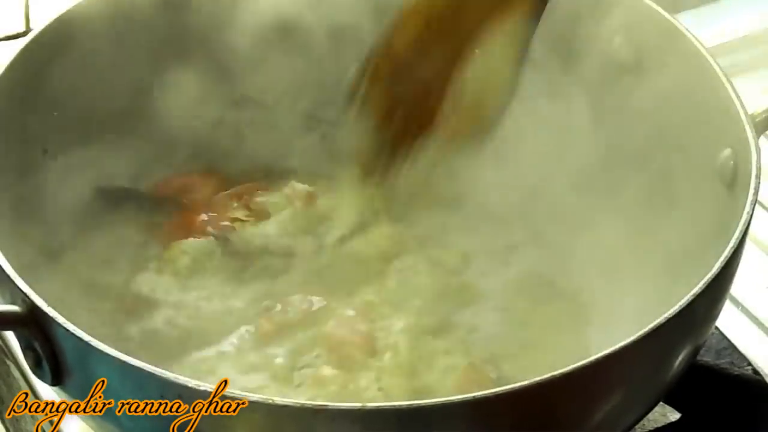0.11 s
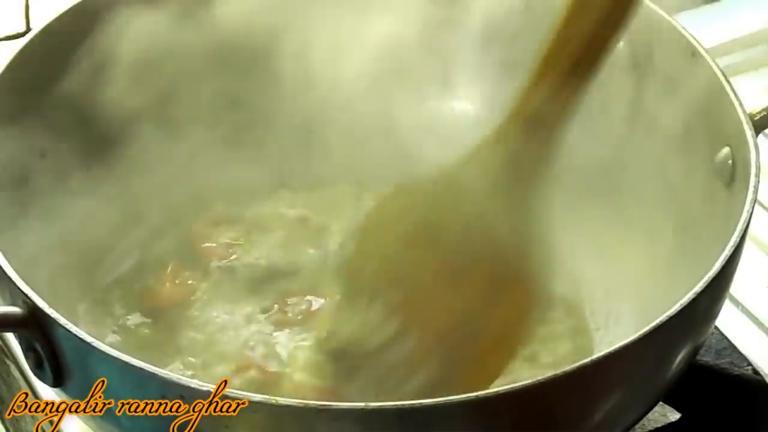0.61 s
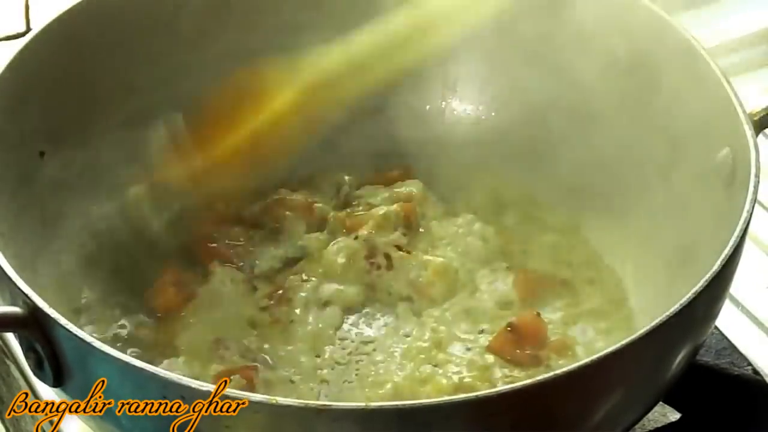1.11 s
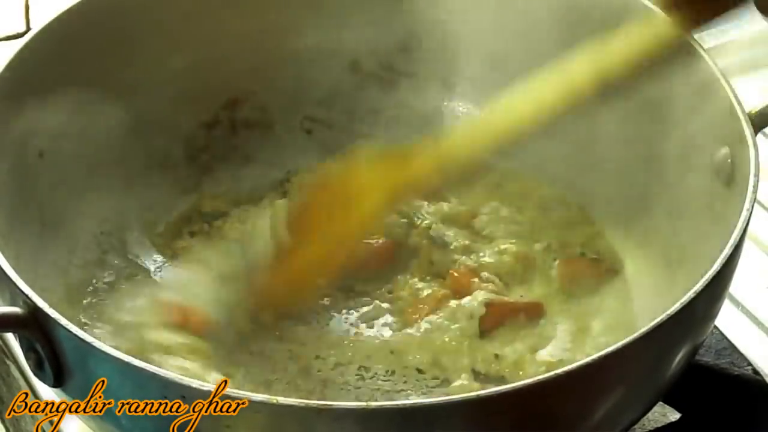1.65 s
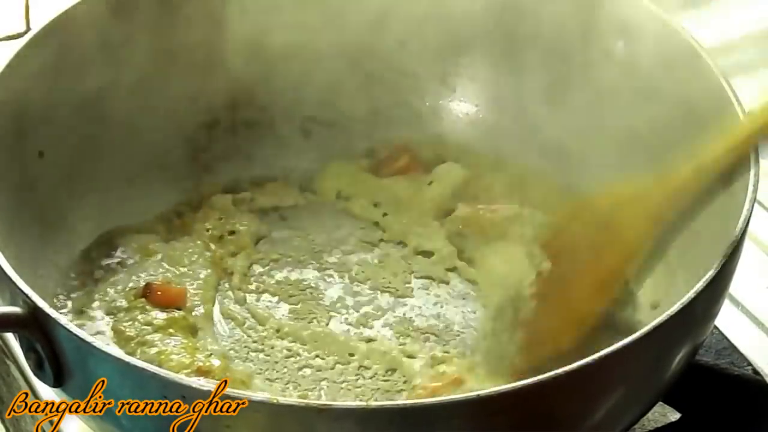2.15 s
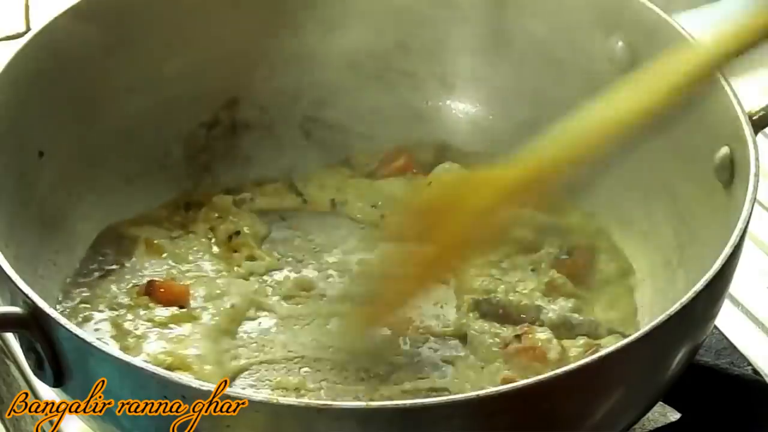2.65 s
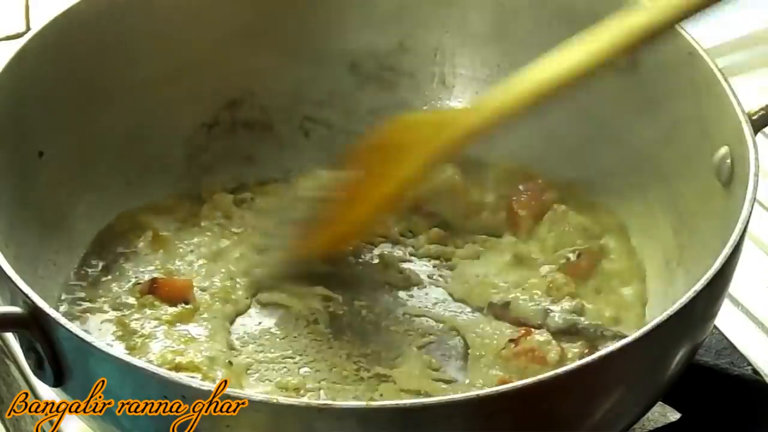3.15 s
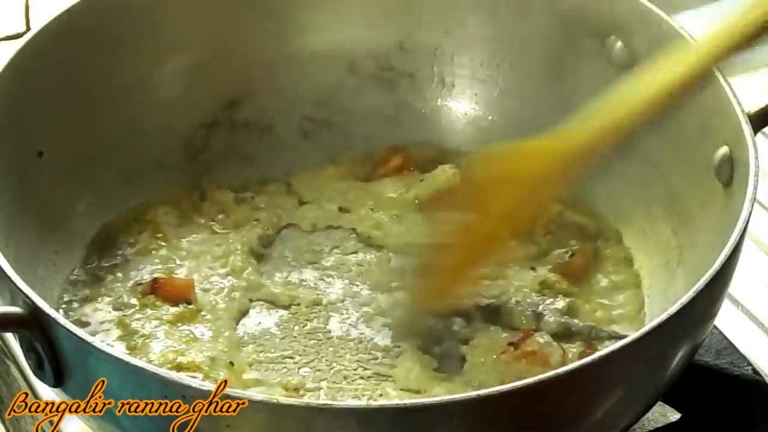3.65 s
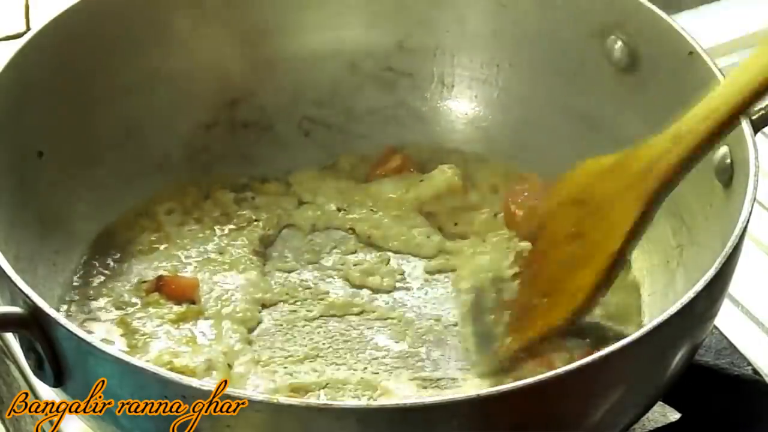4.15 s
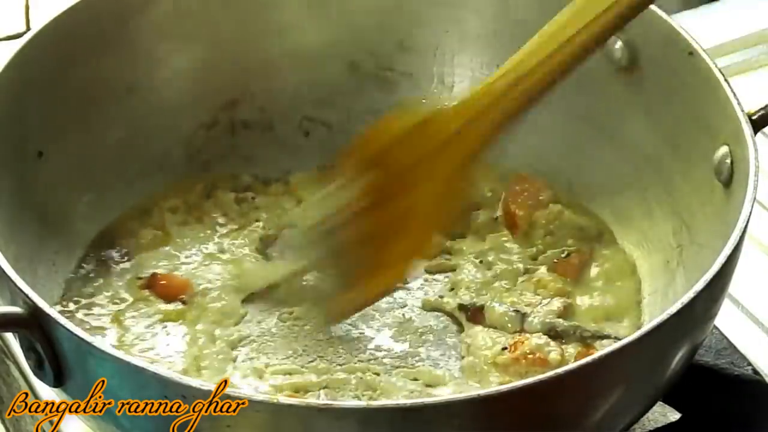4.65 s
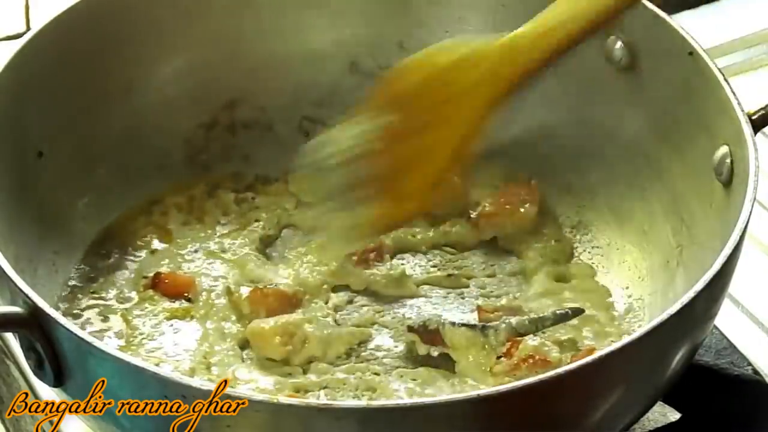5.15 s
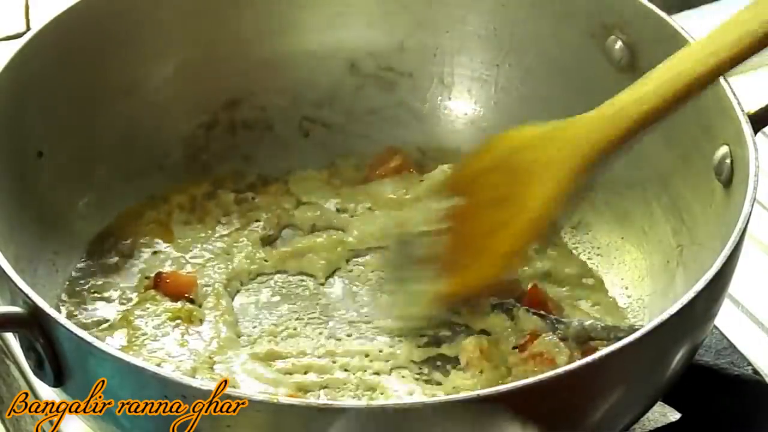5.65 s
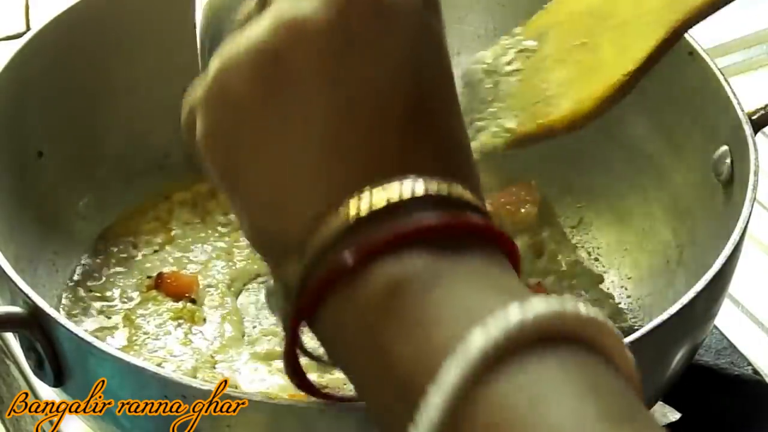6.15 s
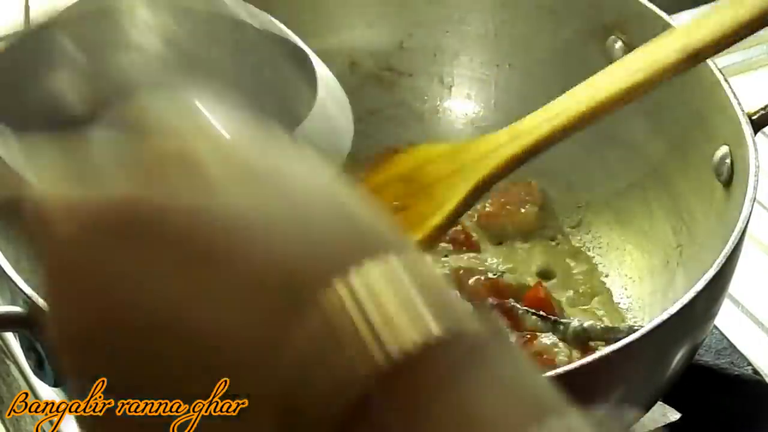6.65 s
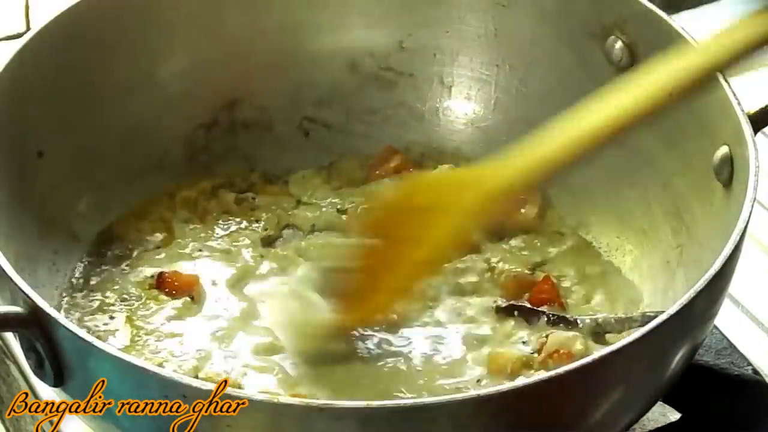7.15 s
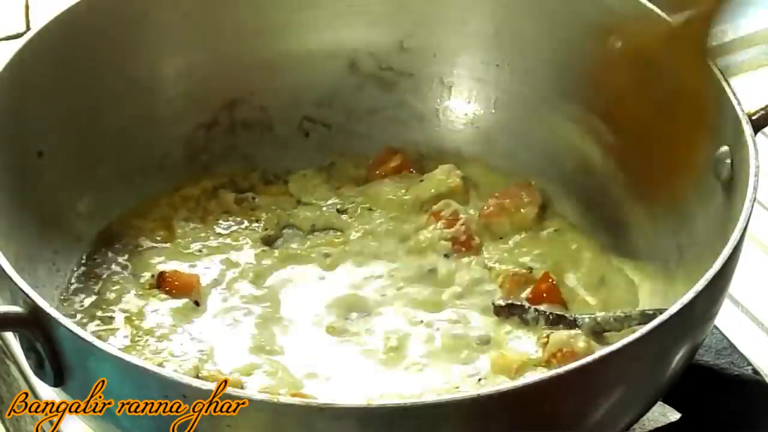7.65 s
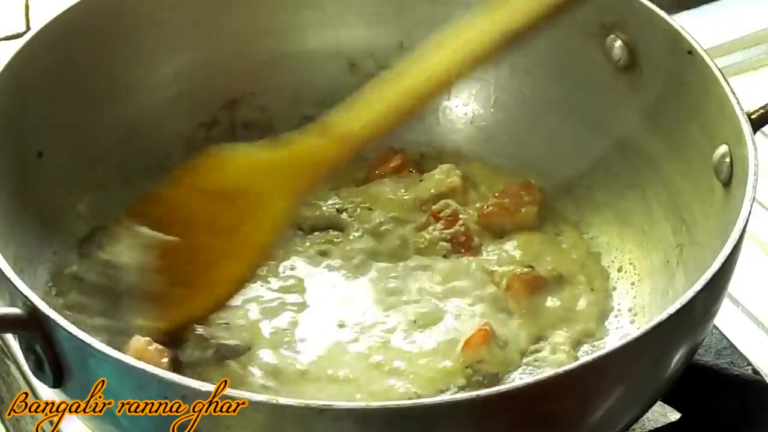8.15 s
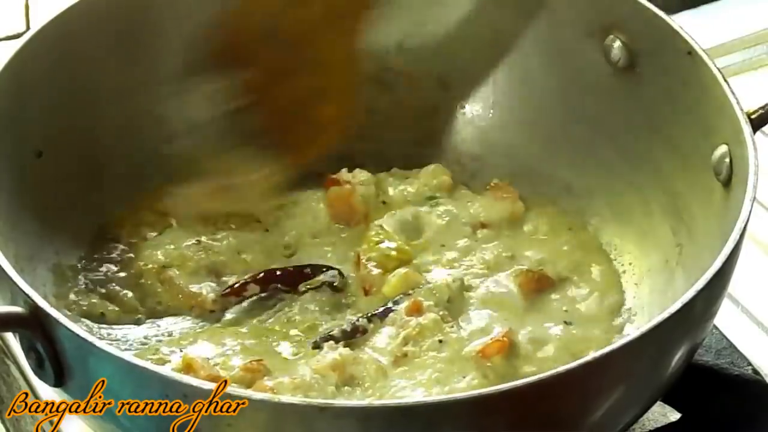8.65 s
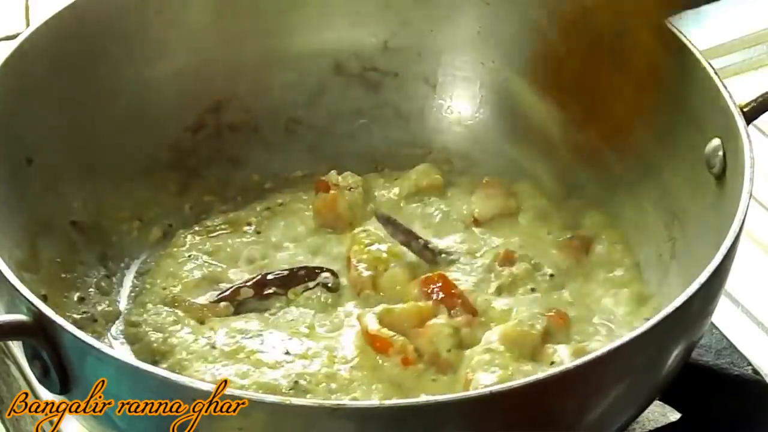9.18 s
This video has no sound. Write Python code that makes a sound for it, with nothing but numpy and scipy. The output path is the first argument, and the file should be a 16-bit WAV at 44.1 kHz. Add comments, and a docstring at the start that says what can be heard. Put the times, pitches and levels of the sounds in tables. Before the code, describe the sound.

Wet spice paste sizzles loudly in a thin metal pan, gradually calming, while a wooden spatula knocks and scrapes now and then.

```python
"""In a thin metal pan, a wet spice paste fries in hot oil over a gas flame. Countless steam bubbles burst:
random clicks, coloured by pitch, make the sizzle, with a patchy grain. The bursts also shake the pan, which
rings at its own pitches (modes), and drops spit in a quick stream of sharp clicks. A wooden spatula knocks and
drags on the metal; filtered noise makes the low rumble of the flame."""
import sys
import numpy as np
from scipy import signal
from scipy.io import wavfile
from scipy.ndimage import uniform_filter1d

SR = 44100
rng = np.random.default_rng(int(sys.argv[2]) if len(sys.argv) > 2 else 0)


def persist_wave(psi):
    """Save psi, clipped to +-1, as 16-bit WAV."""
    counts = np.round(np.clip(psi, -1, 1) * 32767).astype(np.int16)
    wavfile.write(sys.argv[1], SR, np.atleast_2d(counts).T)


def amplitude_ratio(level_db):
    """Convert a level in decibels to the matching linear amplitude (field) ratio."""
    exponent = np.asarray(level_db, float) / 20
    return 10 ** exponent


N = 409670   # length in samples

# How strongly the paste fries over time. Each row: time in seconds, relative level of the fine
# spray in dB, relative level of the large bubbles in dB.
FRYING = [(0.0, -20, -30), (0.18, -19, -30), (0.5, -20, -31), (0.7, -22, -32), (1.0, -19.5, -28),
          (1.6, -19, -28.5), (1.9, -18.5, -25.5), (2.82, -21.5, -28), (3.18, -20.5, -27), (4.3, -23, -29.5),
          (5.95, -26.5, -32.5), (6.15, -27.5, -32.5), (6.6, -27.5, -33.5), (6.9, -25, -31.5),
          (7.42, -27.5, -33), (7.76, -26, -34), (8.42, -28, -34), (8.51, -24, -33), (8.64, -23.5, -33),
          (8.75, -24.5, -34), (8.97, -31, -34), (9.19, -24, -33), (9.29, -27, -33.5)]
# Touches of the spatula. Each row: start in seconds, relative blow on the floor in dB, relative blow on
# the wall in dB, drag in seconds (before stretching), dulling by paste in dB per octave (modes use it
# only when negative).
SPATULA_TOUCHES = [(.049, -36, -31, 0.011, -20), (.109, -42, -41, 0.036, -20), (.242, -25, -41, 0.013, -26),
                   (0.389, -39, -36, 0.009, -20), (.765, -32, -33, 0.027, -3),
                   (1.126, -19.5, -30, 0.0045, -33), (1.45, -42, -28.5, 0.046, 0),
                   (4.199, -36, -46, 0.017, -2), (4.837, -28.5, -37, 0.028, -21.5),
                   (5.239, -36, -33.5, 0.016, -11.5), (7.428, -14.5, -36, 0.024, 0),
                   (7.629, -37, -28, 0.059, -24), (8.254, -29, -36, 0.028, -24),
                   (8.409, -40, -21, 0.022, 3), (9.203, -28, -37, 0.02, -34)]
# Modes of the pan. Each row: pitch in Hz, width in Hz (before any damping by a touch), then relative
# levels in dB under the frying, struck on the floor, struck on the wall.
PAN_MODES = [(160, 23, -27, -27, -26), (206, 34, -14, -8.5, -12), (289, 56, -12, -7.5, -9),
             (361, 28, -9.5, -11, 0.5), (429, 56, -8.5, 4.5, -13), (509, 24, -9.5, -8, -11),
             (551, 27, -6, -7, -12), (634.6, 36, -0.5, 1, -12), (699, 71, -8, 2, -22),
             (784, 73, -3.5, 6.5, -2), (892.5, 18.5, -1, 0.5, -6.5), (959, 41, -8.5, 0, -18),
             (1058, 25, -4.5, -6, -20), (1140, 33, -1.5, -8.5, -13), (1258, 37, -5, -13, -22),
             (1312, 22, -3.5, -22, -28), (1419, 67, -0.5, -10, -20), (1657, 56, 1, -3, -2),
             (1772, 35, 3.5, -12, 0), (1843, 40, 4, -8, 4), (2008, 86, 3, -11, -5), (2205, 25, 0.5, -20, 0),
             (2443, 73, 2.5, -11, 1), (2994, 34, 4, -6, -2.5), (3160, 35, 1, -17, 2),
             (3542, 133, 2.5, -7, 9), (3820, 120, 1, -1, -3), (4070, 68, 1, -6, -8)]
# Colour of the bursting bubbles. Each row: pitch in Hz, relative level in dB per Hz.
BURST_COLOUR = [(940, -37), (1600, -6), (1960, 1), (2500, 5), (3700, 3), (4200, 5), (4700, 4.5), (5200, 5),
                (5900, 6), (6600, 3.5), (7400, 0.5), (8200, 1.5), (10300, -0.5), (13000, -2.5),
                (15700, -1.5)]
# Colour of the burner's rumble. Each row: pitch in Hz, relative level in dB per Hz.
RUMBLE_COLOUR, RUMBLE_DB = [(15, -45), (25, -16), (91, -8), (124, -12), (167, -10), (200, -2.5), (260, -29),
                            (440, -120)], -59
# Left-right noise heard with the sizzle, which itself is mono. Each row: pitch in Hz, usual level of
# the noise against the sizzle in dB.
SIDE_NOISE = [(3000, -27.5), (5000, -22.5), (6800, -25), (7300, -11.5), (11000, -10), (12500, -4.5),
              (16000, -6.5)]
# Pitch of the large, middle and fine bubbles. The three entries are in Hz.
BUBBLE_HZ = [2820, 5890, 11080]
# Modes of the pan stand. Each row: pitch in Hz, width in Hz.
STAND_MODES = [(100, 30), (150, 12.4), (200, 19)]
# The pan rocks on its stand after a push. Each row: start in seconds, relative level in dB.
ROCKS = [(.049, -38), (0.766, -38), (1.126, -41), (1.451, -38), (5.239, -42), (7.428, -44), (8.254, -40),
         (8.409, -37)]

BURSTS_PER_S, SIZE_SPREAD_DB = 26000, 2
MIDDLE_LIKE_SPRAY, MIDDLE_DB = 0.45, -0.5   # share of the way from large bubbles to spray, then an offset
HUM_DB, HUM_FOLLOWS = -38.5, 0.79   # pan hum at mean frying; its share of the large bubbles' swing in dB
SPITS_PER_S, SPIT_DB = 150, 10.5   # spit level is against the spray, before size and filter


def rms_one(x):
    """Scale to an average power of one."""
    return x / np.sqrt(np.mean(x ** 2) + 1e-20)


def at_hz(points, hz):
    """Read a table of levels between its rows, on a log scale of pitch."""
    table_hz, level_db = np.array(points)[:, 0], np.array(points)[:, 1]
    return np.interp(np.log(hz), np.log(table_hz), level_db)


def drift(rate):
    """A slow random wander of spread 1, changing about rate times a second."""
    step = 32   # worked out at every 32nd sample only
    r = np.exp(-2 * step * np.pi * rate / SR)
    noise = rng.standard_normal(N // step + 2002)
    slow = signal.lfilter([1], [1, -2 * r, r * r], noise)[2000:]   # skip the filter's start
    return np.interp(np.arange(N) / step, np.arange(len(slow)), rms_one(slow))


def band(x, low_hz, high_hz):
    """Keep the sound between two pitches."""
    edges_hz = [low_hz, min(high_hz, .48 * SR)]
    return signal.sosfilt(signal.butter(2, edges_hz, "band", fs=SR, output="sos"), x)


def resonate(x, hz, width_hz):
    """One mode driven by a steady shaking, with gain 1 at its own pitch."""
    r = np.exp(-np.pi * width_hz / SR)
    drive = np.array([1, 0, -1]) * (1 - r * r) / 2
    return signal.lfilter(drive, [1, -2 * r * np.cos(2 * np.pi * hz / SR), r * r], x)


def struck(push, hz, width_hz):
    """One mode set ringing: a unit push starts a dying sine of height 1."""
    r, w = np.exp(-np.pi * width_hz / SR), 2 * np.pi * hz / SR
    return signal.lfilter([0, np.sin(w)], [1, -2 * r * np.cos(w), r * r], push)


def patches(shape, wide, long):
    """A random field over pitch and time, spread 1, smoothed over so many pitch bins and time frames."""
    field = rng.standard_normal(shape)
    for _ in range(2):
        field = uniform_filter1d(field, wide, axis=0)
        field = uniform_filter1d(field, long, axis=1)
    return rms_one(field)


def random_clicks(size_db, per_s):
    """Clicks of given sizes and random sign at random moments."""
    size = amplitude_ratio(size_db) * rng.choice([-1, 1], N)
    return size * (rng.random(N) < per_s / SR)


def bursts():
    """Bubbles burst at random moments, most small, a few large."""
    return rms_one(random_clicks(SIZE_SPREAD_DB * np.minimum(rng.exponential(1, N), 6), BURSTS_PER_S))


def burner():
    """The gas flame rumbles low: noise in half-octave bands, with a drifting level."""
    edges_hz = 20 * 2 ** (np.arange(8) / 2)
    noise = rng.standard_normal((2, N))   # neighbouring bands use different noise
    rumble = 0
    for k, (low_hz, high_hz) in enumerate(zip(edges_hz, edges_hz[1:])):
        level_db = at_hz(RUMBLE_COLOUR, np.sqrt(low_hz * high_hz))
        rumble = rumble + amplitude_ratio(level_db) * band(noise[k % 2], low_hz, high_hz)
    return amplitude_ratio(RUMBLE_DB + 1.7 * drift(4)) * rms_one(rumble)


def rocking():
    """A pushed pan wobbles briefly and the modes of the stand answer low."""
    out, t = np.zeros(N), np.arange(round(.4 * SR)) / SR
    for s, level_db in ROCKS:
        swell = (t / 0.042) * np.exp(-t / 0.044)   # grows, then dies away
        wobble = 0.028 * rng.standard_normal(len(t)) * swell
        answer = sum(struck(wobble, hz, width_hz) for hz, width_hz in STAND_MODES)
        at = round(s * SR)
        out[at:at + len(t)] += amplitude_ratio(level_db) * band(answer, 87, 280)[:N - at]
    return out


def spatula():
    """A soft blow and a juddering drag set the modes ringing; paste under the blade dulls the high ones."""
    out, t = np.zeros(N), np.arange(round(.4 * SR)) / SR
    for s, floor_db, wall_db, drag_s, dull_db in SPATULA_TOUCHES:
        judder = rng.standard_normal(len(t))
        push = 0.021 * judder * np.exp(-t / (1.58 * max(drag_s, .002)))
        push[0] = 0.52   # the blow itself
        chances_db = 0.62 * rng.standard_normal(len(PAN_MODES))
        sound = 0
        for k, (hz, width_hz, _, on_floor_db, on_wall_db) in enumerate(PAN_MODES):
            dulled_db = min(dull_db, 0) * max(np.log2(hz / 650), 0)
            # the paste damps the floor
            floor = amplitude_ratio(floor_db + on_floor_db) * struck(push, hz, 1.08 * width_hz)
            # on the wall, high modes die sooner
            wall = amplitude_ratio(wall_db + on_wall_db) * struck(push, hz, (0.28 + hz / 3500) * width_hz)
            sound = sound + (-1) ** k * amplitude_ratio(chances_db[k] + dulled_db) * (floor + wall)
        # a bare edge cracks on the wall
        sound = sound + amplitude_ratio(wall_db + 2 * dull_db - 1.0) * judder * np.exp(-t / 0.005)
        # wood yields, so the ring builds up
        sound = band(sound, 290, 7000) * (1 - np.exp(-t / 0.00053))
        at = round(s * SR)
        out[at:at + len(t)] += sound[:N - at]
    return out


def pan_under_frying(large_db, hum_db, seething_db):
    """The bursts keep every mode of the pan sounding; neighbours swing in opposite phase."""
    shaking = bursts() * amplitude_ratio(seething_db)
    low, high = 0, 0
    for k, (hz, width_hz, level_db, *_) in enumerate(PAN_MODES):
        mode = (-1) ** k * amplitude_ratio(level_db + 1.3 * drift(3.8)) * resonate(shaking, hz, width_hz)
        if hz < 1550:
            low = low + mode
        else:
            high = high + mode
    return amplitude_ratio(hum_db) * rms_one(low) + amplitude_ratio(large_db - 2.5) * rms_one(high)


def spits(spray_db):
    """Drops of water crack sharply in the oil: short clicks at random moments."""
    cracks = random_clicks(3.0 * np.minimum(rng.exponential(1, N), 3), SPITS_PER_S)
    return amplitude_ratio(spray_db + SPIT_DB) * band(cracks + 1e-18, 1520, 14000)


def sizzle(sizes_db, seething_db):
    """The sizzle, coloured by bubble size, with a random grain and left-right noise in small patches."""
    grid = dict(fs=SR, nperseg=512, noverlap=384)
    hz, s, (mid, side) = signal.stft([bursts(), rng.standard_normal(N)], **grid)
    hz = np.maximum(hz, 50)
    at = np.minimum(s * SR, N - 1).astype(int)
    # how much each bubble size counts at each pitch
    shares = [np.interp(np.log(hz), np.log(BUBBLE_HZ), one)[:, None] for one in np.eye(3)]
    offsets_db = [-5.0, -5.0, -3.0]
    size_db = sum(share * (db[at] + offset) for share, db, offset in zip(shares, sizes_db, offsets_db))
    fine_grain = patches(mid.shape, 2, 5)
    broad_grain = patches(mid.shape, 14, 5)
    noise_patches = patches(mid.shape, 6, 8)
    # the level flickers in patches of pitch and time, most in the treble
    grain_db = (1.2 + 1.1 * shares[1] + 2.3 * shares[2]) * fine_grain + .7 * broad_grain
    gain = amplitude_ratio(at_hz(BURST_COLOUR, hz)[:, None] + size_db + grain_db + 8.5)
    # the left-right noise comes and goes in patches
    side_gain = amplitude_ratio(at_hz(SIDE_NOISE, hz)[:, None] + 4.2 * noise_patches)
    mid, side = signal.istft([gain * mid, gain * side_gain * side], **grid)[1][:, :N]
    left_right = mid + side * [[1], [-1]]
    return amplitude_ratio(seething_db) * left_right


def scene():
    """Add up flame, pan, spatula, spits and sizzle as the frying rises and falls."""
    s, *columns = np.transpose(FRYING)
    spray_db, large_db = [np.interp(np.arange(N) / SR, s, column) for column in columns]
    middle_db = large_db + MIDDLE_LIKE_SPRAY * (spray_db - large_db) + MIDDLE_DB
    hum_db = HUM_DB + HUM_FOLLOWS * (large_db - large_db.mean())
    seething_db = 0.13 * drift(9) + 0.38 * drift(31)   # the whole surface flares together
    pan = rocking() + spatula() + pan_under_frying(large_db, hum_db, seething_db)
    frying = spits(spray_db) + sizzle([large_db, middle_db, spray_db], seething_db)
    return burner() + pan + frying


def roll_off(x):
    """The treble ends steeply here."""
    return signal.sosfilt(signal.butter(12, 16990, fs=SR, output="sos"), x)


def record(dry):
    """A steep filter cuts the top of the mix, above 15740 Hz."""
    steep = signal.ellip(14, .3, 80, 15740, fs=SR, output="sos")
    finished = signal.sosfilt(steep, dry)
    return roll_off(finished)


dry = scene()
out = record(dry)
persist_wave(out)
```